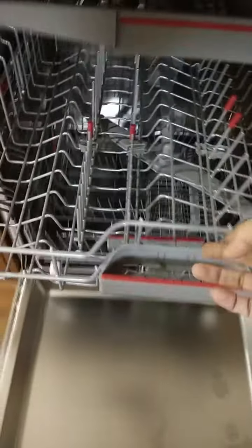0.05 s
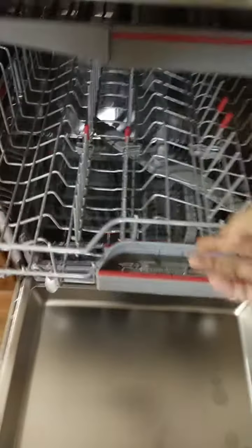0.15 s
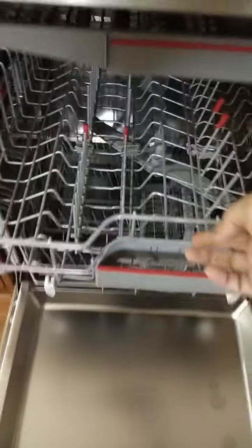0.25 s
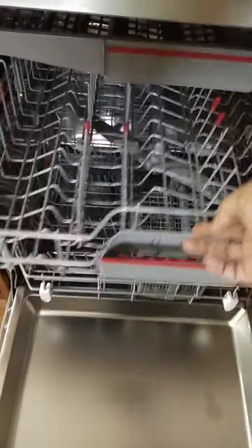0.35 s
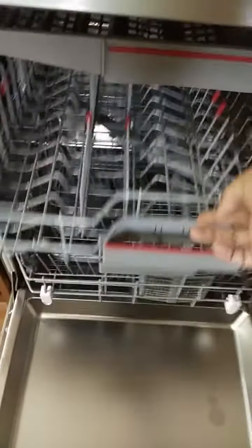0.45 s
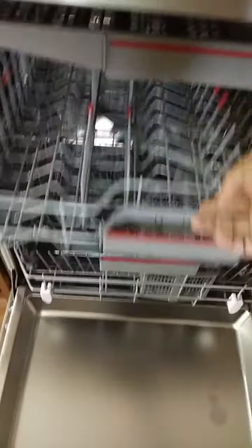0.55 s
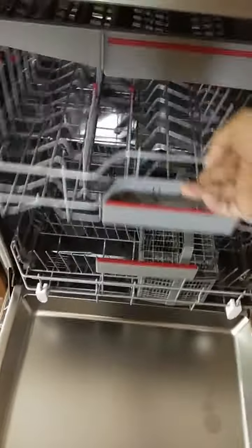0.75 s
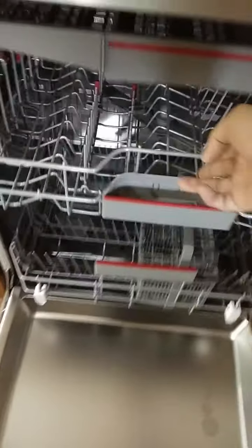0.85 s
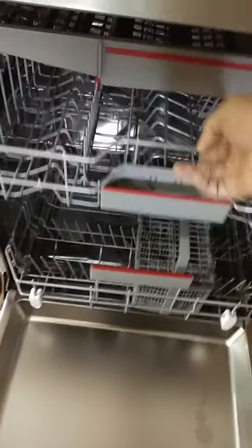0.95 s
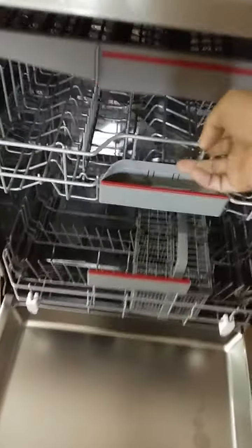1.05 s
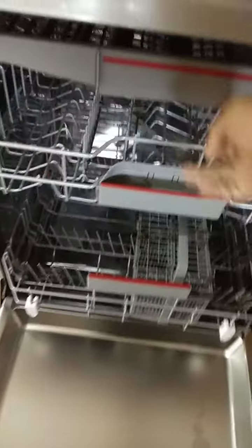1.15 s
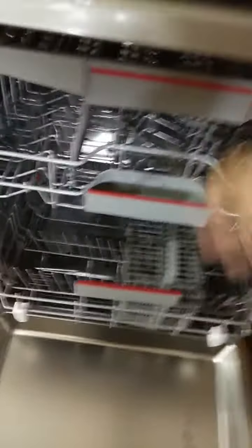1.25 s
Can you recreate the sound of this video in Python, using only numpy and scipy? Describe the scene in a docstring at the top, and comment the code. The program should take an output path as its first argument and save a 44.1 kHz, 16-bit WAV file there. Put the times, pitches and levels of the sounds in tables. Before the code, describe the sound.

Close up in a quiet kitchen, a dishwasher rack rolls in with a scrape and low rumble. A burst of rattling knocks comes first, then two softer bumps, each ringing briefly through the steel wires and tub.

```python
"""Dishwasher rack on its rails

Close up in a quiet kitchen, in stereo: a wire dishwasher rack is pushed along its rails by hand.
Its wheels rumble and scrape; it jolts over the rail joints in a quick clatter, then bumps twice more.
Every contact rings the steel wires and the hollow tub, and dies away in the tub and the room."""
import sys
import numpy as np
from scipy import signal
from scipy.fft import rfft, irfft
from scipy.io import wavfile

SR = 44100
rng = np.random.default_rng(int(sys.argv[2]) if len(sys.argv) > 2 else 0)


def materialize(psi):
    """Save the field psi as 16-bit PCM at rate SR to the path in sys.argv[1].

    A 1-D psi becomes a single channel; in a 2-D psi each row is a channel.
    """
    bounded = np.clip(np.atleast_2d(psi).T, -1, 1)
    quanta = np.round(bounded * 32767).astype(np.int16)
    wavfile.write(sys.argv[1], SR, quanta)


N = 57330

RING_SAMPLES = int(.7 * SR)
MESH_LOW_HZ, MESH_TOP_HZ = 800.2, 16090  # span of the many weak wire modes
HEAVE_HZ = 139  # the tub's first heave under a thud


def amp(db):
    """Decibels to gain."""
    return 10 ** (np.asarray(db) / 20)


def value_at(points, hz):
    """Reads a curve on a log-frequency axis."""
    pitches, values = np.transpose(points)
    return np.interp(np.log(hz + 1), np.log(abs(pitches) + 1), values)


def add(mix, start_s, sound):
    """Mixes a sound in at start_s."""
    part = mix[:, round(start_s * SR):][:, :sound.shape[1]]
    part += sound[:, :part.shape[1]]


def colour(x, spectrum, size=4096):
    """Minimum-phase filter from rows of frequency_hz, gain_db."""
    log_gain = np.log(amp(value_at(spectrum, abs(np.fft.fftfreq(size, 1 / SR)))))
    taps = np.fft.ifft(np.exp(np.conj(signal.hilbert(log_gain)))).real[:size // 2]
    return signal.fftconvolve(x, taps[None], axes=1)[:, :x.shape[1]]


def diffuse_noise(count):
    """White noise at the microphones, alike on both sides in the bass and unrelated in the treble."""
    # Likeness of left and right: frequency_hz, correlation
    likeness = [(60, .99), (125, .95), (250, .7), (500, .42), (1000, .05), (16000, 0)]
    alike = value_at(likeness, np.fft.rfftfreq(count, 1 / SR))
    mid, side = rfft(rng.standard_normal((2, count))) * np.sqrt([(1 + alike) / 2, (1 - alike) / 2])
    return irfft(np.array([mid + side, mid - side]), count)


def room_tone():
    """The faint, steady hush of the kitchen."""
    # Spectrum of the quiet room: frequency_hz, gain_db
    hush_spectrum = [(25, -4.5), (150, -2.5), (500, -2), (1500, -13.5), (8000, -17), (16000, -5)]
    hush = colour(diffuse_noise(N), hush_spectrum)
    return amp(-63) * hush / np.sqrt(np.mean(hush ** 2))


def reflections(decay, ripple_db, ripple_step_hz=257.5):
    """A dense tail with an uneven spectrum, each band dying at its own speed."""
    hz, t, bands = signal.stft(diffuse_noise(RING_SAMPLES), SR, nperseg=256)
    rate = np.log(1000) / value_at(decay, hz)[:, None]
    fading = bands * np.exp(-rate * t) * np.sqrt(2 * rate / SR)
    tail = signal.istft(fading, SR, nperseg=256)[1][:, :RING_SAMPLES]
    bass_dip = [(HEAVE_HZ, -2.5), (MESH_LOW_HZ / 2, 0)]  # the deepest bass scatters less
    ripple_hz = MESH_LOW_HZ + ripple_step_hz * np.arange(len(ripple_db))
    return colour(tail, bass_dip + list(zip(ripple_hz, ripple_db)))


def mode(hz, energy_db, t60_s):
    """One dying resonance, as a complex wave."""
    rate = np.log(1000) / t60_s
    wave = np.exp((2j * np.pi * hz - rate) * np.arange(RING_SAMPLES) / SR)
    return 2 * amp(energy_db) * np.sqrt(rate / SR) * wave


def stereo_mode(hz, energy_db, t60_s, phases=None, spread_hz=1700):
    """A mode at the two microphones: unless given phases, in step in the bass and apart higher up."""
    if phases is None:
        phases = np.array([1, -1]) * min(hz / spread_hz, np.pi / 4)
    return (np.exp(1j * phases)[:, None] * mode(hz, energy_db, t60_s)).imag


def tub_ring():
    """The low modes of the hollow tub."""
    # Tub modes: pitch_hz
    pitches = [126, 166, 202, 278, 314, 400, 480, 557, 661, 702, 812]
    # Their strengths: level_db
    levels = [-33.5, -26.5, -24.5, -37.5, -29, -30, -34, -36, -25.5, -26.5, -34]
    return sum(stereo_mode(hz, db, t60_s=.27) for hz, db in zip(pitches, levels))


def mesh_ring(count=160):
    """The rack's many weak wire modes, scattered through the mids and treble."""
    pitches = MESH_LOW_HZ + (MESH_TOP_HZ - MESH_LOW_HZ) * (np.arange(count) + rng.random(count)) / count
    levels = 2 * rng.standard_normal(count)
    phases = rng.uniform(0, 2 * np.pi, (count, 2))
    mesh = sum(stereo_mode(hz, db, t60_s=.17, phases=pair) for hz, db, pair in zip(pitches, levels, phases))
    return amp(-11.5) * mesh / np.linalg.norm(mesh[0])


def clear_wires():
    """The longest-ringing steel wires, one mode a row."""
    # Wire modes: pitch_hz
    pitches = [3838, 4742, 5439, 6520, 6999, 7924, 8486, 8571, 8947, 10144, 10791, 10827, 11311, 15434]
    # Their strengths: level_db
    levels = [-36, -20, -20.5, -22.5, -31, -30, -17.5, -22, -32, -33, -20, -29, -18, -21]
    return np.array([mode(hz, db, t60_s=.24) for hz, db in zip(pitches, levels)])


def contact_response(ringing, wires):
    """One place on the rails: the common ringing, its own mix of clear wires, and its reflections."""
    # Decay of the clatter inside the tub: frequency_hz, t60_s
    tub_decay = [(100, 0.095), (400, 0.061), (2000, 0.099), (12000, 0.05)]
    # Decay of the kitchen: frequency_hz, t60_s
    room_decay = [(100, 0.82), (600, 0.6), (3000, 0.67), (14000, 0.22)]
    ripple_db = 3.5 * np.minimum(rng.standard_normal(80), 1.3)  # each place favours its own wire clusters
    wire_mix = rng.rayleigh(np.sqrt(.5), len(wires)) * np.exp(2j * np.pi * rng.random((2, len(wires))))
    in_tub = amp(-.5) * reflections(tub_decay, ripple_db)
    in_room = amp(-8.5) * reflections(room_decay, ripple_db)
    return ringing + (wire_mix @ wires).imag + in_tub + in_room


def rubbing(ringing, wires, levels, spectrum, contacts_per_s, uneven_db, places=5, dwell_s=.09):
    """A stream of tiny uneven contacts shakes the rack from one place on the rails after another."""
    t = np.arange(N) / SR
    sizes = amp(uneven_db * np.minimum(rng.exponential(1, N), 4)) * rng.choice([-1, 1], N)
    contacts = sizes * (rng.random(N) < contacts_per_s / SR)
    place = (t / dwell_s + rng.random(N)).astype(int) % places
    forces = colour(contacts * (place == np.arange(places)[:, None]), spectrum)
    forces *= amp(np.interp(t, *np.transpose(levels))) / forces.sum(0).std()
    soft_wires = amp(-7) * wires  # rubbing rings the clear wires less than a knock does
    return sum(signal.fftconvolve(force[None], contact_response(ringing, soft_wires), axes=1)[:, :N]
               for force in forces)


def wheel_rumble(ringing, wires):
    """The wheels roll along the rails with a low rumble."""
    # Course of the rolling: time_s, level_db
    levels = [(0, -46), (.12, -58), (.175, -58.5), (.21, -53), (.40, -48.5), (.48, -54.5), (.60, -52.5),
              (.72, -55.5), (.85, -53.5), (.92, -57), (1.02, -49.5), (1.08, -56), (1.199, -55), (1.25, -68),
              (1.3, -75)]
    # Spectrum of the rolling force: frequency_hz, gain_db
    spectrum = [(30, 0), (100, 1.5), (170, -0.5), (280, -3), (420, -7.5), (700, -8.5), (1000, -19),
                (2500, -34), (8000, -56)]
    return rubbing(ringing, wires, levels, spectrum, contacts_per_s=700, uneven_db=4)


def wheel_scrape(ringing, wires):
    """The wheels scrape on the rails in dense, bright contacts."""
    # Course of the scraping: time_s, level_db
    levels = [(0, -40), (.025, -51), (.04, -48.5), (0.071, -46), (0.087, -39.5), (0.134, -40.5),
              (.165, -60.5), (.22, -52.5), (0.369, -32.5), (.41, -45), (0.461, -42.5), (0.483, -54),
              (.63, -60), (.69, -50.5), (.77, -60), (.95, -60), (1.02, -52.5), (1.07, -58), (1.12, -48),
              (1.18, -61), (1.3, -66)]
    # Spectrum of the scraping force: frequency_hz, gain_db
    spectrum = [(200, -23.5), (700, 0), (1150, 2), (2000, 0.5), (4500, 4), (7500, -0.5), (9000, 1.5),
                (12000, -2), (16000, 0)]
    return rubbing(ringing, wires, levels, spectrum, contacts_per_s=2500, uneven_db=2)


def rack_knocks(ringing, wires, bounces=6, chatter_s=.007):
    """Each knock, a blow and a few small bounces, shakes the rack, rings one part and heaves the tub."""
    # Knocks of the rack on its rails:
    # start_s, thud_db, body_db, clack_db, clank_db, ping_db, tick_db, part_pitch_hz, part_level_db
    knocks = [ (.2260, 1.5, -3.5, 0.5, 2, -3, 1, 15450, -14),
              (0.2384, -4.5, 1.5, -1.5, -4.5, -9, -4, 258, -8), (.2450, -2, 6, 5, -6, -6.5, 1, 800, -13),
              (0.2668, 9, -3, 12, -2.5, 0.5, 5, 489, -14),
              (0.2744, 10.5, 6.5, -1, -1.5, -1.5, -4, 736, -12),
              (.2890, -2, 5, -1, -0.5, -0.5, -6, 5570, -17), (.2930, 7, 6, 7.5, -2, 2.5, -5, 10840, -3.5),
              (.3020, 10.5, -3, 1, -10, -12, -14, 315, -14.5),
              (.3280, -12, 4, 2, -13, -25, -10, 8550, -16.5), (.3455, 2, -7, 3.5, -0.5, -6.5, 0, 700, -10),
              (.3540, -7, 6, -4, -5, -3.5, 3, 392, -14), (.3600, -1.5, 0.5, 2, -8.5, -8, 3, 6450, -8),
              (.3720, -6, -2.5, -7, -18, -36, -19, 6500, -8.5),
              (.6510, -8, -9, -12, -17, -17.5, -15, 8540, -38),
              (0.665, -7, 0, -7, -17.5, -11.5, -11, 5440, -24),
              (0.6679, -3, 1.5, -10, -13.5, -10, -2, 262, -17.5),
              (0.684, -2.5, -2, -23, -30, -19, -18, 292, -13),
              (0.727, -5, -13, -22, -30, -27, -35, 174, -21),
              (0.876, -18, -21, -24, -31.5, -26.5, -30, 8570, -44),
              (0.991, -15, -10, -20, -18, -32, -32, 690, -30),
              (1.0130, -15.5, -12.5, -28, -23, -19.5, -16, 8700, -29),
              (1.0340, -30, -12, -29, -33, -42, -30, 370, -23),
              (1.119, -4, -16, -25, -23.5, -23.5, -10, 8750, -34),
              (1.1370, -9.5, -2.5, -2.5, -23, -26.5, -20, 373.5, -15.5),
              (1.1420, -7.5, -11, -8, -12, -33, -9, 1107, -15),
              (1.1489, -1.5, -7, -10, -14, -24, -21, 2580, -21.5)]
    # Bands from thud to tick: low_hz, high_hz
    bands = (70, 171), (273, 450), (666, 900), (1340, 4440), (8700, 11500), (14000, 16000)
    out = np.zeros((2, N))
    for start_s, *band_db, part_hz, part_db in knocks:
        blow = np.zeros((1, SR // 10))
        blow[0, 0] = 1
        bounce_at = np.maximum(rng.random(bounces) * chatter_s * SR, 1).astype(int)
        blow[0, bounce_at] += amp(-7.5) * rng.choice([-1, 1], bounces)
        spectrum = [(hz, db) for band, db in zip(bands, band_db) for hz in band]
        force = colour(blow / np.linalg.norm(blow), spectrum)
        add(out, start_s, signal.fftconvolve(force, contact_response(ringing, wires), axes=1))
        add(out, start_s, stereo_mode(part_hz, part_db, t60_s=.066))
        add(out, start_s, stereo_mode(HEAVE_HZ, band_db[0] - 23.5, t60_s=.055))
    return out


def scene():
    """Scraping, rolling and knocks sound through the rack, over the quiet kitchen."""
    # Tone of the rack as a whole: frequency_hz, gain_db
    rack_spectrum = [(25, -24), (60, -17.5), (85, -12), (120, -1), (400, 2), (700, -3), (1100, -4.5),
                     (2000, -0.5), (4000, -3), (6500, -2.5), (7700, -3), (8600, 3), (10800, 1.5),
                     (12500, -1.5), (14500, -15.5), (15600, -9.5)]
    ringing = tub_ring() + mesh_ring()
    wires = clear_wires()
    wheels = wheel_scrape(ringing, wires) + wheel_rumble(ringing, wires)
    return room_tone() + colour(wheels + rack_knocks(ringing, wires), rack_spectrum)


def record(dry):
    """The recorder's band limit takes off the highest treble."""
    cutoff_hz = 15850
    lowpass = signal.firwin(401, cutoff_hz, window=("kaiser", 8), fs=SR)
    return signal.oaconvolve(dry, lowpass[None], "same")


dry = scene()
out = record(dry)
materialize(out)
```